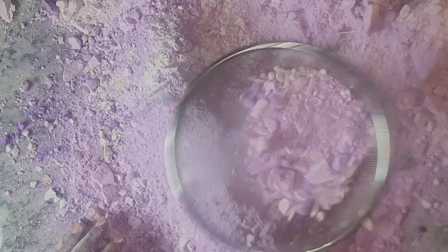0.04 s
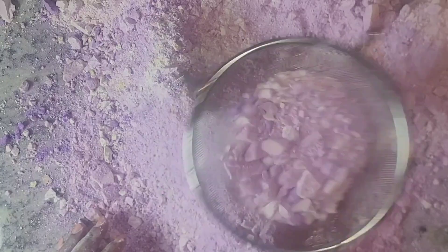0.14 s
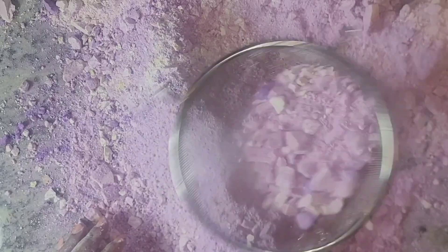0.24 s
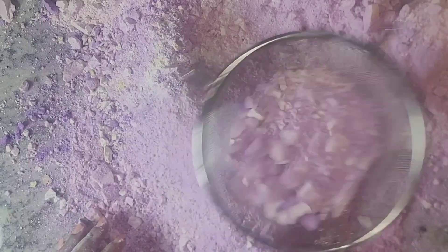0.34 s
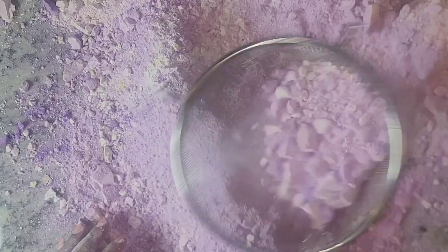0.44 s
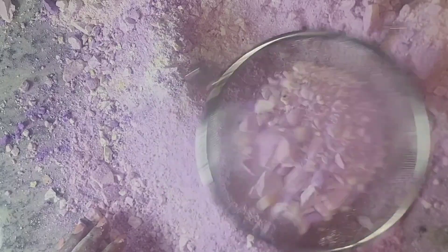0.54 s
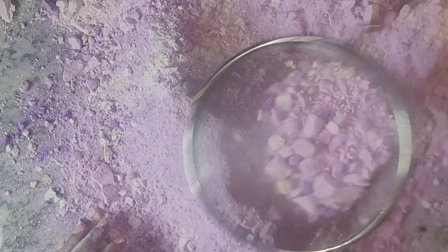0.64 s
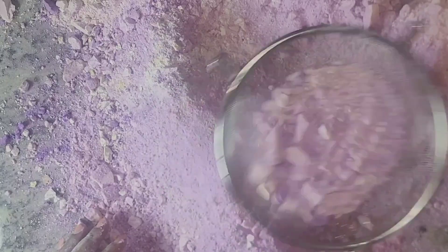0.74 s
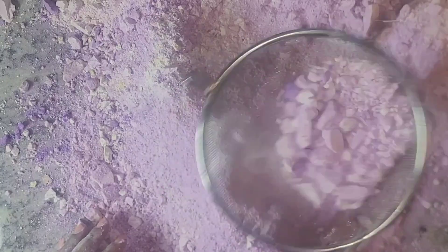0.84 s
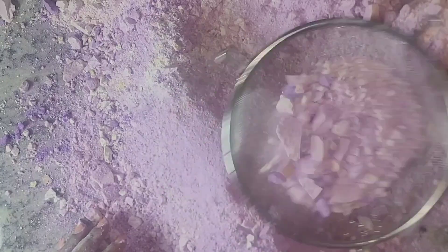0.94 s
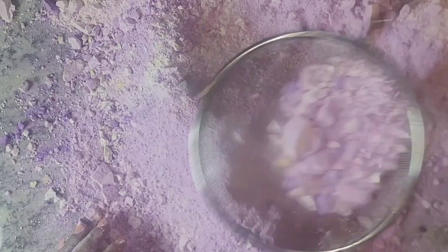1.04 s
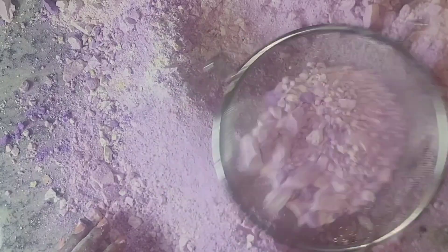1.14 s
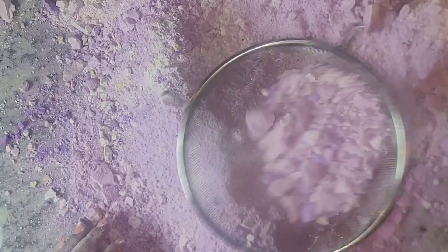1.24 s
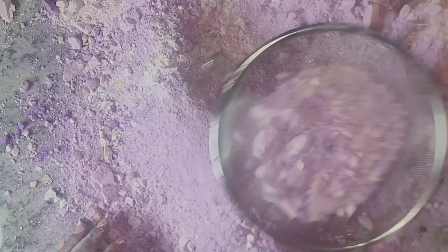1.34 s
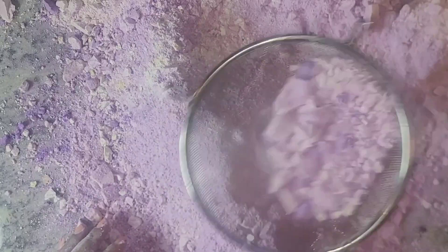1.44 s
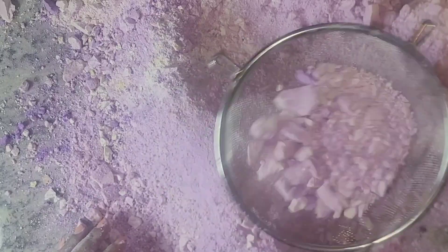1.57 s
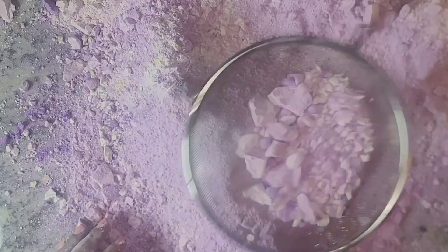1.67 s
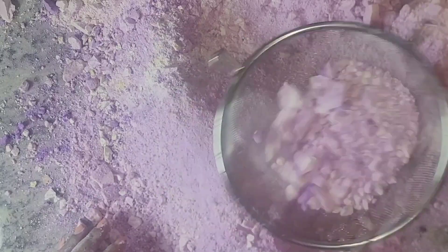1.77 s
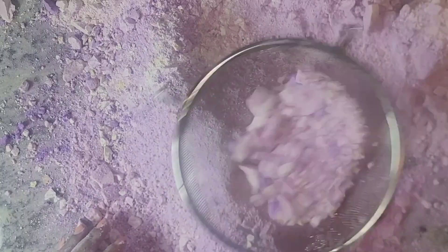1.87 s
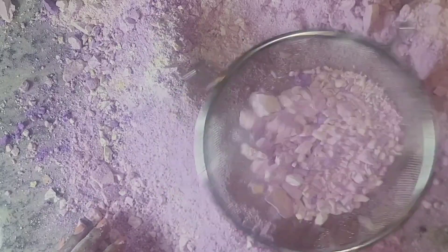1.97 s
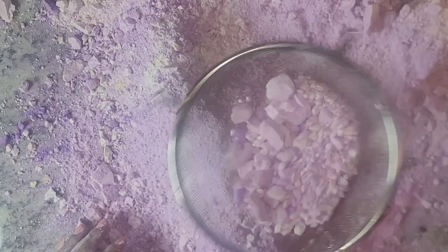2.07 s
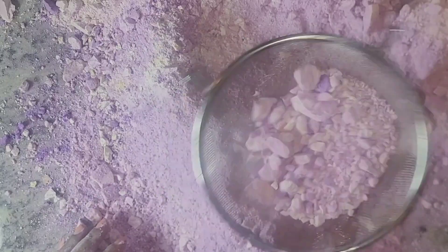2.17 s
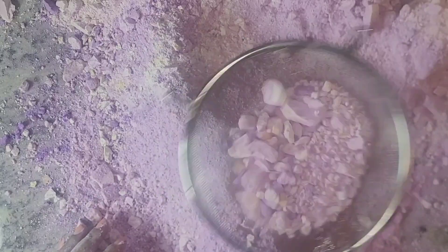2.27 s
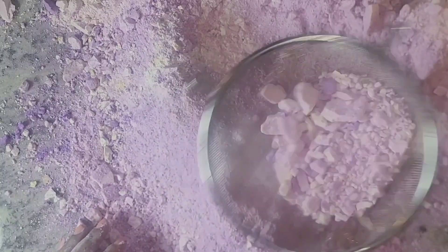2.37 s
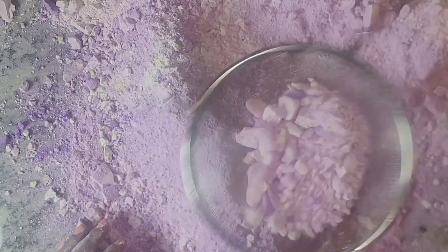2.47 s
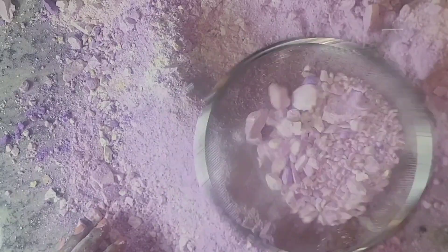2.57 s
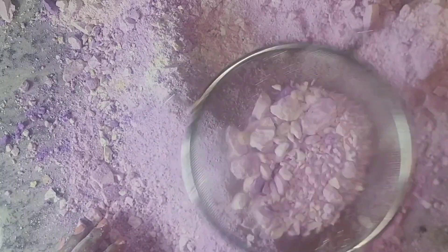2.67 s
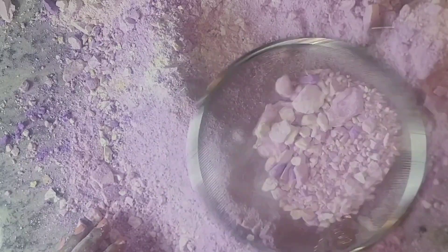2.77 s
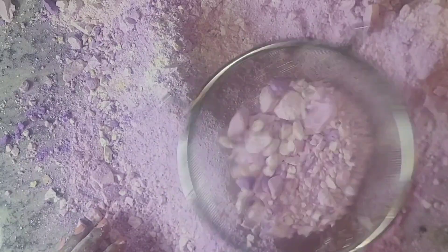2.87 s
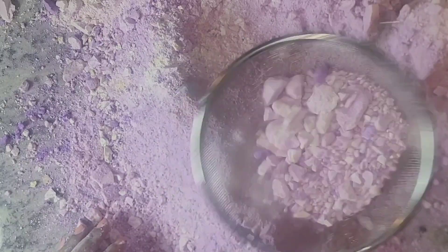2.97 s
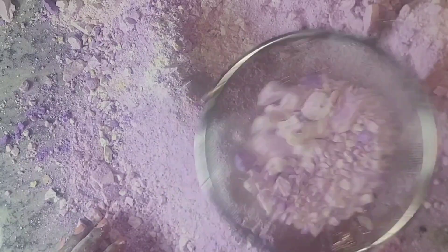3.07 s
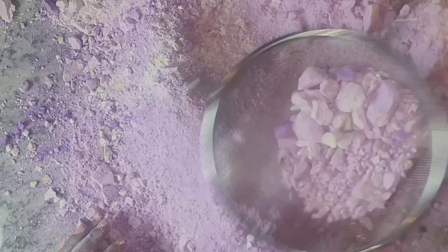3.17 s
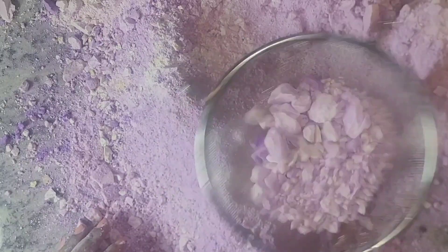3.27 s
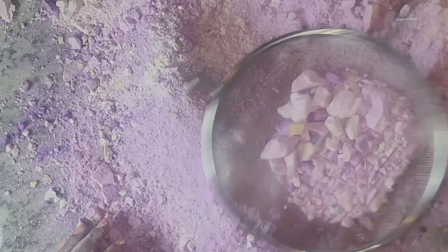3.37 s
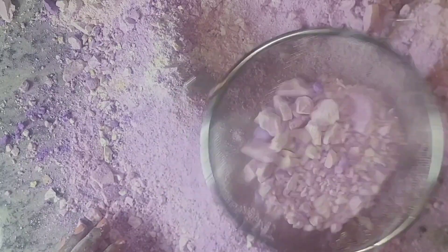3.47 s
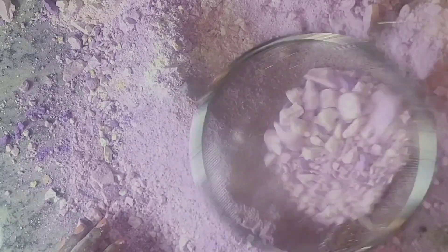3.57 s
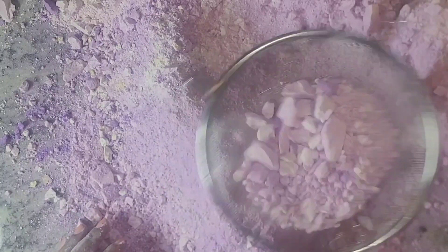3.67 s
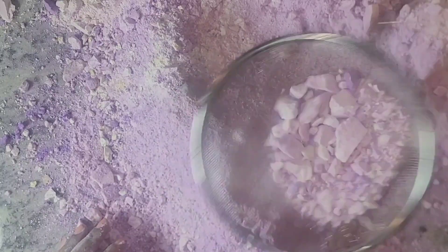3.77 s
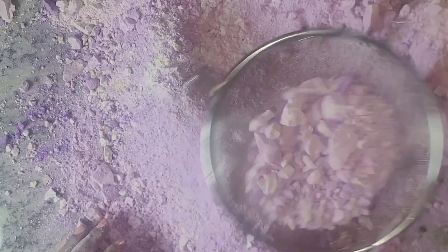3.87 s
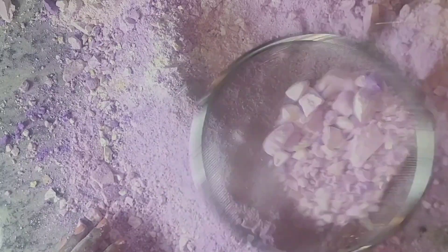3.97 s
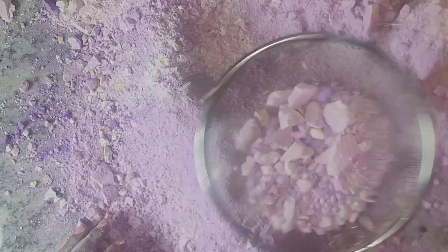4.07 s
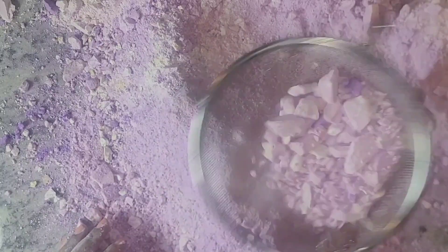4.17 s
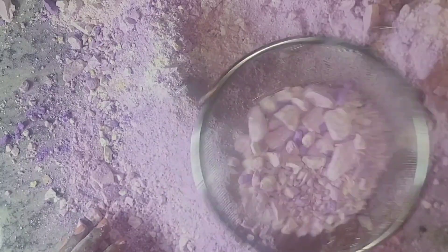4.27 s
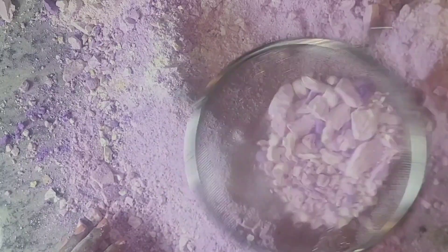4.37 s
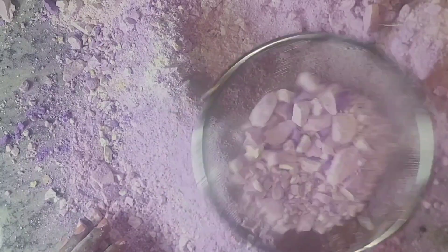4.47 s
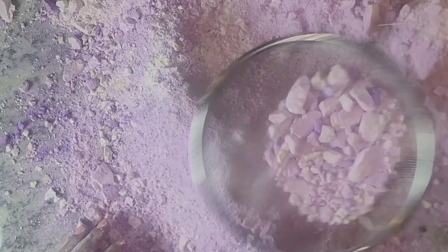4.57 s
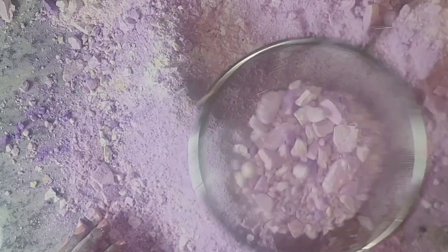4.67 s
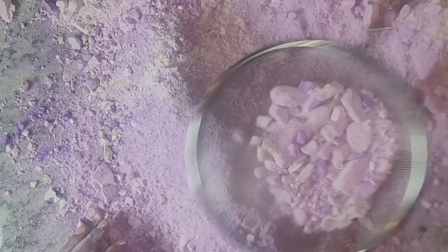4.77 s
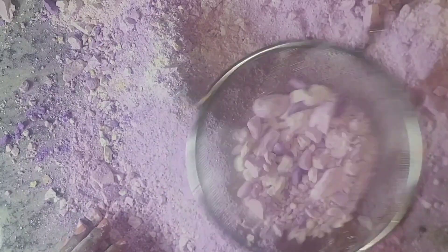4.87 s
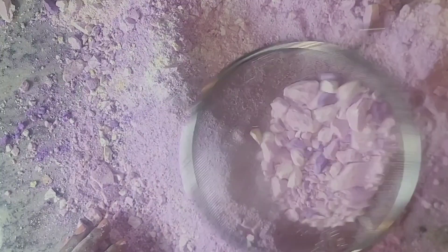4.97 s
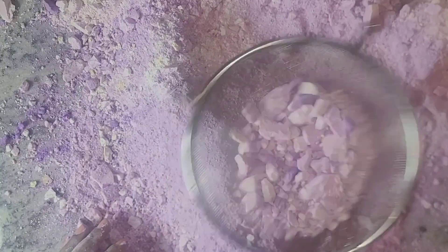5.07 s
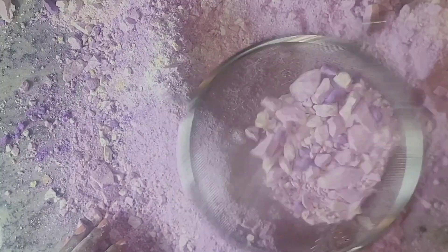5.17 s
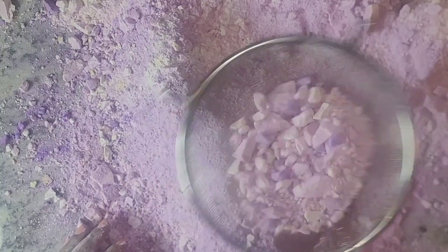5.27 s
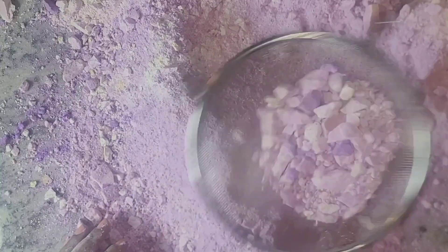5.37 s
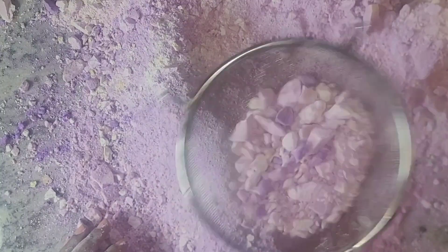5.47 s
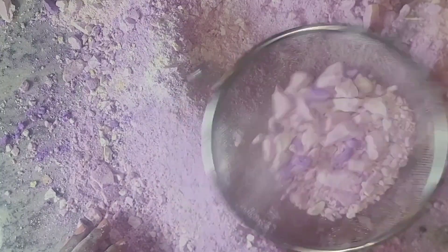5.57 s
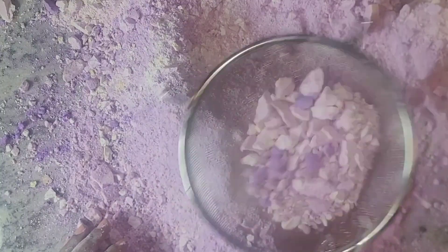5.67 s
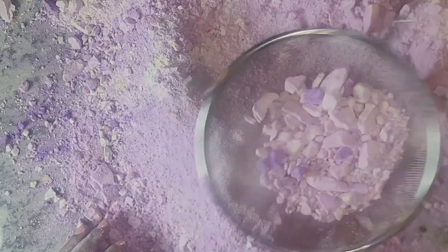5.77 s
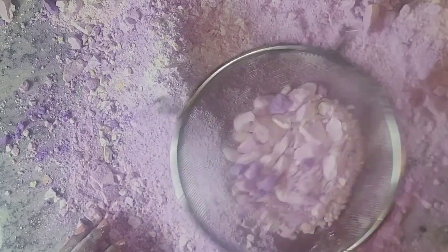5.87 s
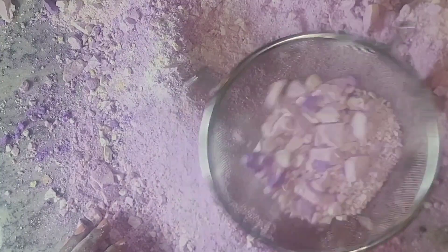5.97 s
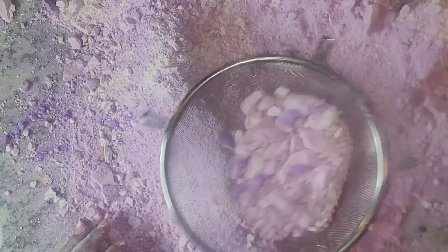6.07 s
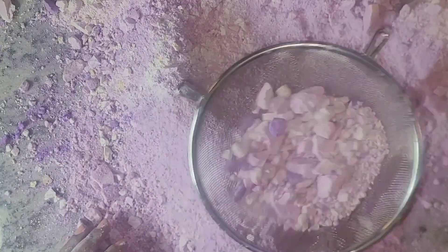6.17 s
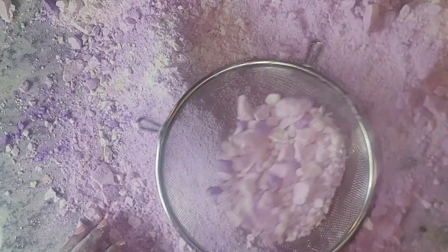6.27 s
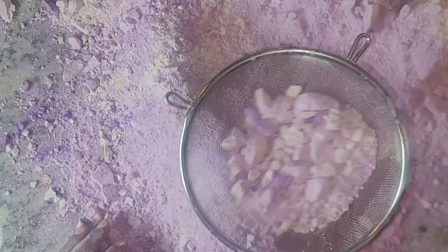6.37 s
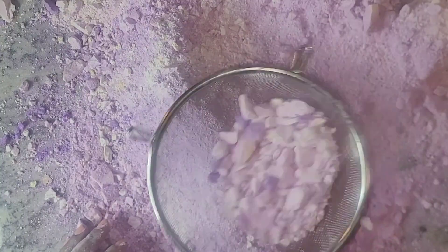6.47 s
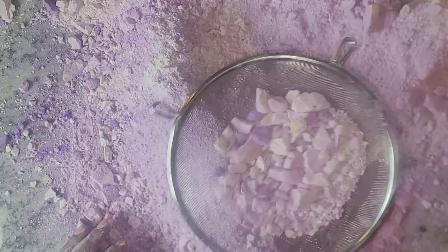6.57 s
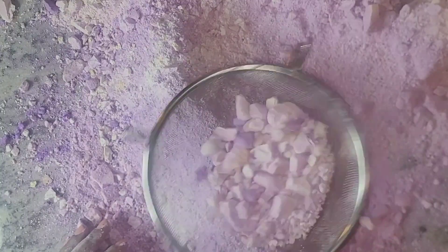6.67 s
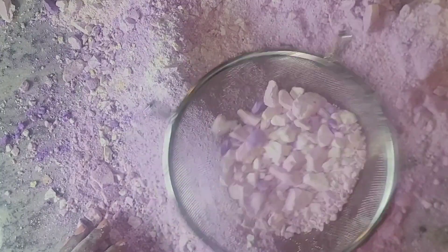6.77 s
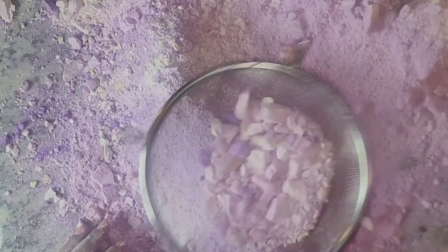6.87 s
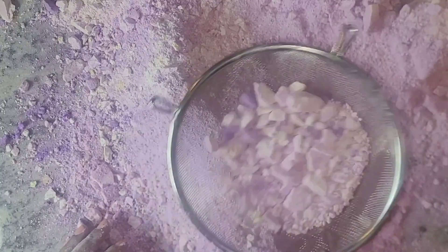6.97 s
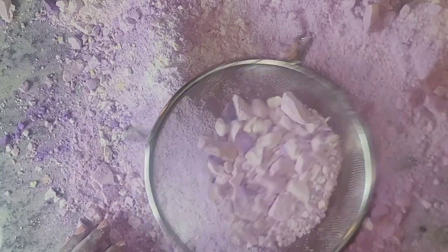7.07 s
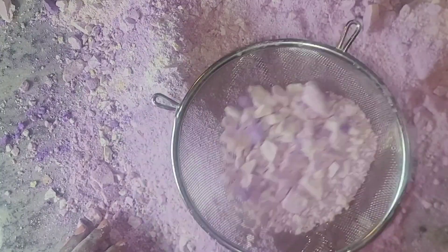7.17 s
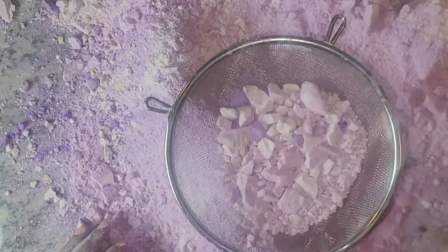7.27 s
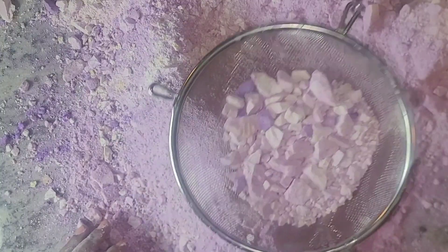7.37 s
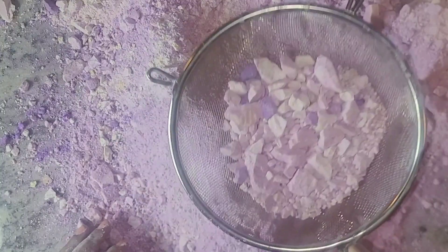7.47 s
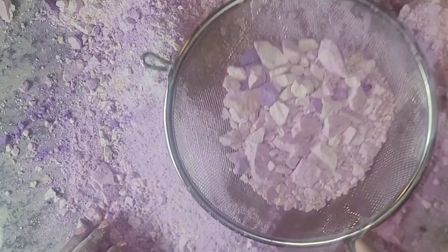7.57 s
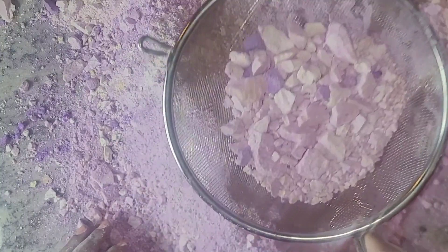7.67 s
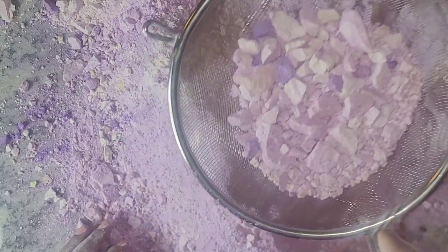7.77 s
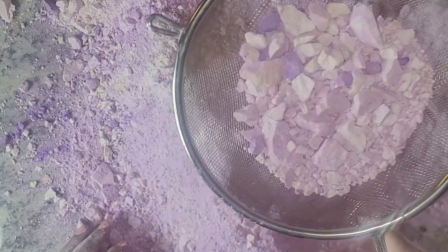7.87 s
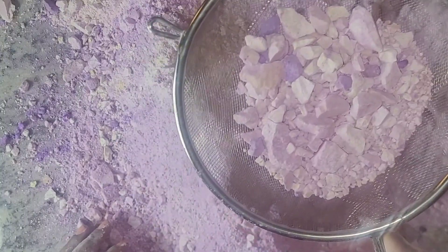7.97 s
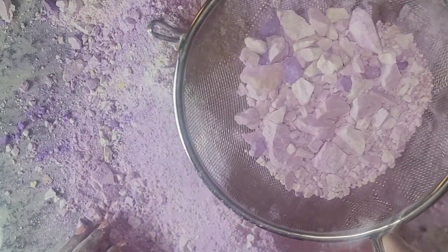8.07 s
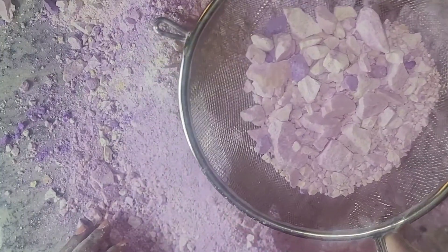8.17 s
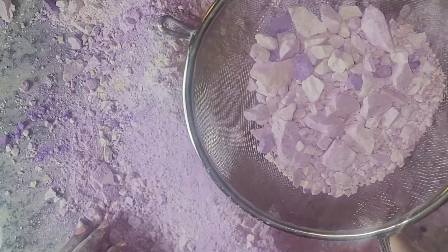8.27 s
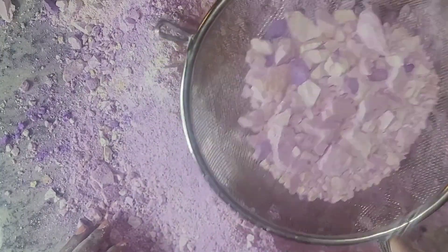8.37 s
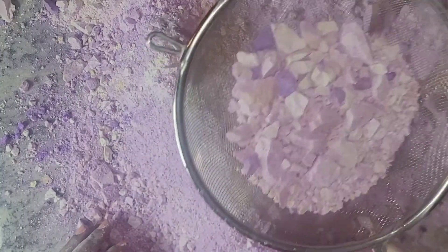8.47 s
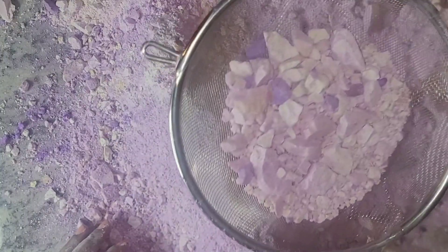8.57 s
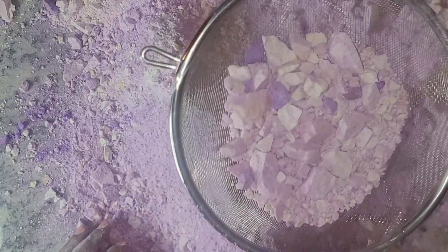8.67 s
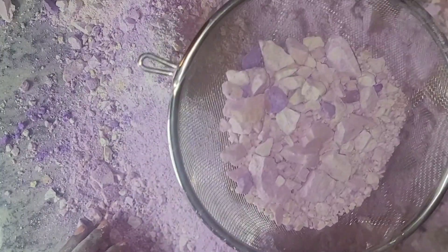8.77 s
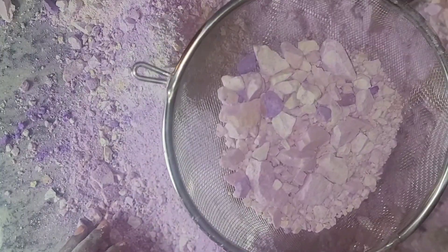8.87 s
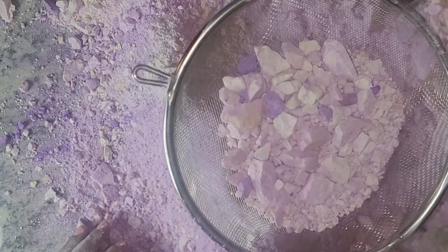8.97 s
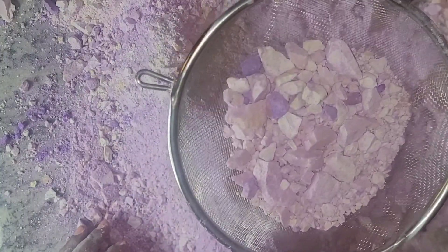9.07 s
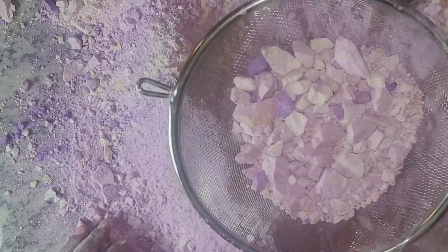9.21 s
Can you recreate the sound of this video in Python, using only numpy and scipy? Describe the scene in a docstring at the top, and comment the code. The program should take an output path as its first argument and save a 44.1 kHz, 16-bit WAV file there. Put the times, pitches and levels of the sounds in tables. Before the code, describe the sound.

Fast, steady to-and-fro sifting of hard chalky pieces in a metal strainer, gritty and bright, stopping after seven seconds with a faint clink and powder hiss.

```python
"""Shaking chalk in a wire sieve

Crushed chalk is shaken to and fro in a wire-mesh sieve, five times a second, close to the microphone.
Random crumb contacts rasp and set the mesh resonances ringing; chunks knock, and noise bursts click.
A distant small clink, made of fading sine tones, is heard during the shaking and again near the end.
The heap settles, then a little powder slides, as filtered grains. Sine tones make a low mains hum and
spells of a thin whine."""
import sys
import numpy as np
from scipy import signal
from scipy.fft import rfft, irfft, next_fast_len
from scipy.io import wavfile

SR = 44100
rng = np.random.default_rng(int(sys.argv[2]) if len(sys.argv) > 2 else 0)


def unload_wav(signal):
    """Save mono or channel-first audio to the path in sys.argv[1] as 16-bit WAV at rate SR, clipped to [-1, 1]."""
    wavfile.write(
        sys.argv[1],
        SR,
        np.round(np.clip(np.atleast_2d(signal).T, -1, 1) * 32767).astype(np.int16),
    )


N = 407484
CUTOFF_HZ = 15150  # nothing is heard much above this


def from_db(db):
    """Turn decibels into a gain."""
    return 10 ** (np.asarray(db) / 20)


def rms_one(x):
    """Scale a sound to an average (rms) strength of 1."""
    return x / np.sqrt(np.mean(x ** 2) + 1e-20)


def clock():
    """Time of every sample, in seconds."""
    return np.arange(N) / SR


def in_time(rows, times):
    """Read each column of a table at the given times, joining its points by straight lines."""
    seconds, *columns = np.transpose(rows)
    return [np.interp(times, seconds, column) for column in columns]


def at_hz(points, hz):
    """Read a spectrum between its points, on a log-frequency axis."""
    point_hz, value = np.transpose(points)
    return np.interp(np.log(hz + 1e-3), np.log(point_hz), value)


def drift(rate):
    """Slow random wandering with a spread of 1; a higher rate wanders faster."""
    # made at a twentieth of the sample rate; the first 4000 values let the filter settle
    r = np.exp(-40 * np.pi * rate / SR)
    noise = rng.standard_normal(N // 20 + 4002)
    slow = signal.lfilter([1], [1, -2 * r, r * r], noise)[4000:]
    return np.interp(np.arange(N) / 20, np.arange(len(slow)), rms_one(slow))


def cut(x, hz, kind):
    """Second-order filter that keeps the lows ("low") or the highs ("high")."""
    return signal.sosfilt(signal.butter(2, min(hz, .45 * SR), kind, fs=SR, output="sos"), x)


def colour(x, spectrum):
    """Shape a steady sound to a spectrum that falls away below its first point; rms 1."""
    size = next_fast_len(N)
    hz = np.arange(size // 2 + 1) * SR / size
    low_fall = np.minimum(hz / spectrum[0][0], 1) ** 4
    gain = from_db(at_hz(spectrum, hz)) * low_fall * (hz < CUTOFF_HZ)
    return rms_one(irfft(rfft(x, size) * gain, size)[:N])


def resonate(x, modes):
    """Let a sound excite resonances side by side; each mode is (pitch [Hz], width [Hz], level [dB])."""
    out = 0
    for hz, width, db in modes:
        r = np.exp(-np.pi * width / SR)
        feedback = [1, -2 * r * np.cos(2 * np.pi * hz / SR), r * r]
        ring = signal.lfilter([1, 0, -1], feedback, x + 1e-18)
        out = out + from_db(db) * (1 - r * r) / 2 * ring
    return out


def grains(per_s, spread_db):
    """Random contacts of uneven size, with the same mean power at any rate."""
    sizes = from_db(spread_db * np.minimum(rng.exponential(1, N), 4)) * rng.choice([-1, 1], N)
    touches = rng.random(N) < per_s / SR
    return rms_one(sizes * touches / np.sqrt(per_s))


def burst(start_s, t60):
    """Noise that starts at once and fades by 60 dB in t60 seconds."""
    age = clock() - start_s
    return rng.standard_normal(N) / 2 * (age >= 0) * from_db(-60 * np.clip(age / t60, 0, 3))


def swell(slides):
    """Power of the sliding heap: each stroke rises and falls as a bell, its length taken at half power."""
    t = clock()[::16]
    power = 0
    for middle_s, db, length_s in slides:
        bell = .5 ** np.minimum((2 * (t - middle_s) / length_s) ** 2, 60)
        power = power + from_db(2 * db) * bell
    return np.interp(clock(), t, power)


def trickle(power, t60):
    """Loose pieces keep rolling after a stroke, so its power dies away gradually."""
    r = from_db(-60 / (t60 * SR)) ** 2
    return signal.lfilter([1 - r], [1, -r], power)


# colour of the still air: (pitch [Hz], level [dB per Hz])
AIR_COLOUR = [(140, -4), (210, 0.5), (300, -5.5), (500, -10), (750, -12), (1000, -17.5), (2000, -23),
              (3000, -27.5), (5000, -30), (10000, -47.5), (15000, -42)]
# colour of the low rumble: (pitch [Hz], level [dB per Hz])
RUMBLE_COLOUR = [(22, -22), (38, 6), (58, 5), (80, 8.5), (110, 8.5), (150, 0), (220, -26.5)]
# loudness of the low rumble: (time [s], level [dB])
RUMBLE_LEVEL = [(0, -49), (.9, -48), (1.2, -43), (1.8, -46), (2, -51), (3.8, -44), (4.2, -45.5), (6.3, -44),
                (7.5, -48), (8.2, -48)]


def room_tone():
    """Still air and a low rumble, both filtered noise; the rumble slowly changes in level."""
    air = from_db(-49.0) * colour(rng.standard_normal(N), AIR_COLOUR)
    rumble_db, = in_time(RUMBLE_LEVEL, clock())
    return air + from_db(rumble_db) * colour(rng.standard_normal(N), RUMBLE_COLOUR)


# colour of each microphone port's own noise: (pitch [Hz], level [dB per Hz])
PORT_COLOUR = [(20, 20), (80, -3), (130, 4), (190, 4), (1000, 13), (15000, 8.5)]


def port_noise():
    """Faint noise that each of the two microphone ports has for itself."""
    return from_db(-64.5) * np.array([colour(rng.standard_normal(N), PORT_COLOUR) for port in range(2)])


SHAKE_PERIOD_S, SHAKING_ENDS_S = 0.1994, 7.1  # the hand keeps a steady beat
PUSH_S = 0.03  # a push is always short
RETURN_DB, RETURN_S = -33.5, 0.041  # the heap's tumble back, before effort, stalls and fading alter it
RETURN_FOLLOWS = 0.45  # share of the swing in effort that reaches the return
SLOWER_PER_DB = 0.0758  # a weaker return lasts longer, by about this share per dB
RETURN_FADE_DB_PER_S = 0.27  # the heap lightens as chalk sifts through
# the hand runs a little ahead of or behind its beat:
# (time [s], lag of the push [s], wait until the heap returns [s])
HAND_TIMING = [(0, .027, .088), (1.2, .02, .083), (2, 0.01, 0.081), (2.4, -0.0055, 0.085),
               (3.7, -.022, 0.091), (4.8, -0.0092, 0.081), (5.1, -0.012, 0.091), (6, 0.022, 0.091),
               (6.2, 0.034, 0.076), (7, 0.026, 0.081)]
# effort of the hand, as the level of a push: (time [s], level [dB])
HAND_EFFORT = [(0, -29.5), (.5, -29), (1, -31.5), (1.4, -30), (1.8, -28.5), (2.05, -33.5), (2.55, -29),
               (3.2, -30.5), (3.38, -33.5), (3.55, -31), (4.8, -31), (5, -29), (5.2, -30.5), (5.8, -31),
               (6, -29), (6.2, -33), (6.6, -33.5), (7, -32.5)]
# the heap hangs on the mesh and only creeps back: (time [s], loss [dB])
HEAP_STALLS = [(0.12, 5.5), (0.9, 5.5), (1.29, 3.3), (2.09, 4), (2.27, 3.5), (3.06, 3.5), (3.46, 4),
               (5.68, 4), (6.29, 4), (6.5, 3), (6.69, 2.3), (7.09, 2.2)]


def strokes():
    """Each shake throws the heap forward, then lets it tumble back: lists of (time s, level dB, length s)."""
    beats = np.arange(0, SHAKING_ENDS_S, SHAKE_PERIOD_S)
    lag, wait = in_time(HAND_TIMING, beats)
    push_db, = in_time(HAND_EFFORT, beats)
    push_s = beats + lag
    back_s = push_s + wait
    effort_swing = push_db - push_db.mean()
    fade_db = RETURN_FADE_DB_PER_S * (beats - beats.mean())
    back_db = RETURN_DB + RETURN_FOLLOWS * effort_swing - fade_db
    for stall_s, loss_db in HEAP_STALLS:
        nearest = np.argmin(np.abs(back_s - stall_s))
        back_db[nearest] -= loss_db
    back_length = RETURN_S * np.exp(SLOWER_PER_DB * (RETURN_DB - back_db))
    pushes = [(s, db, PUSH_S) for s, db in zip(push_s, push_db)]
    return pushes, list(zip(back_s, back_db, back_length))


# tones of the mains hum, before wavers and dips: (pitch [Hz], rms level [dB], spread of the waver [dB])
HUM_TONES = [(120.26, -34, 0.32), (59.5, -50.5, 4.5), (210, -61, -2), (293, -65, 0)]


def hum(dip_db=4.0, lead_s=0.049, dip_s=0.016):
    """Mains hum of wavering sine tones, which dips briefly as the sieve turns for each push."""
    t = clock()
    coarse_t = t[::16]
    pushes, _ = strokes()
    turning = 0
    for push_s, _, _ in pushes[1:]:
        # the dip comes a little before the push
        distance = (coarse_t - push_s + lead_s) / dip_s
        turning = turning + np.exp(-np.minimum(distance ** 2, 60))
    tones = 0
    for hz, db, waver in HUM_TONES:
        level = np.sqrt(2) * from_db(db + waver * drift(8.3))
        tones = tones + level * np.sin(2 * np.pi * (hz * t + rng.random()))
    return tones * from_db(-dip_db * np.interp(t, coarse_t, turning))


def chips(per_s, count=16):
    """Hard chips tick against each other, each size at its own pitch."""
    ticks, dealt = grains(per_s, spread_db=5.0), rng.integers(0, count, N)
    pitches = np.geomspace(2500, 9000, count) * rng.uniform(0.82, 1.0, count)
    return rms_one(sum(resonate(ticks * (dealt == k), [(hz, hz / 25, 0)]) for k, hz in enumerate(pitches)))


# colour of the crumbs' rasp: (pitch [Hz], level [dB per Hz])
CRUMB_COLOUR = [(250, -10), (380, -3.5), (700, -9), (1400, -8.5), (2000, -4), (3000, -1), (4500, -2),
                (6500, 0), (8000, -2), (10000, -6.5), (12500, -7.5), (15500, -9.5)]
# resonances of the loaded mesh: (pitch [Hz], width [Hz], level [dB])
MESH_MODES = [(2246, 74, 6.5), (2320, 60, 3.5), (2570, 60, 3), (3490, 130, -5), (4135, 110, 2),
              (4300, 92, -25), (4890, 41, -2)]
# body resonances of the knocking heap, also used for the dull knocks:
# (pitch [Hz], width [Hz], level [dB])
HEAP_MODES = [(376, 30, 4.5), (580, 350, -2), (940, 130, 3.5), (1090, 117, 1), (1390, 240, -1),
              (1743, 114, 2.5), (2450, 220, -3)]


def shaking():
    """Crumbs rasp on the wire, the mesh rings most on the push, the chunks knock most on the way back."""
    pushes, returns = strokes()
    push, back = swell(pushes), swell(returns)
    rolling = trickle(push + back, t60=0.52)
    slide = push + back + from_db(-18) * rolling
    speed = np.sqrt(slide / slide.max())
    # faster sliding makes more contacts a second; the crumbs move in clumps
    rasp = colour(grains(1500 + 13000 * speed, spread_db=0.5), CRUMB_COLOUR) * from_db(1.26 * drift(41))
    # now coarser, now finer crumbs reach the wire
    coarse = signal.sosfiltfilt(signal.butter(1, 5000, fs=SR, output="sos"), rasp)
    fine = rasp - coarse
    rasp = coarse * from_db(1.0 * drift(9.4)) + fine * from_db(1.0 * drift(18))
    # the shifting load favours now one mesh resonance, now another
    scrapes = grains(1200 + 5000 * speed, spread_db=2.0)
    wires = rms_one(sum(resonate(scrapes, [mode]) * from_db(2.0 * drift(5.5)) for mode in MESH_MODES))
    chunks = rms_one(resonate(grains(1000 + 2200 * speed, spread_db=2.5), HEAP_MODES))
    # square roots turn power into loudness of the wave
    return (from_db(-1.5) * rasp * np.sqrt(slide)
            + from_db(-4.5) * wires * np.sqrt(push + 0.3 * back + 0.16 * rolling)
            + from_db(-7.5) * chunks * np.sqrt(0.04 * push + back + 0.44 * rolling)
            + from_db(-11.5) * chips(400) * np.sqrt(.5 * push + back + 0.053 * rolling))


# sharp, bright clicks, as a chunk snaps on the wire or a push starts abruptly:
# (time [s], level before filtering [dB])
BRIGHT_CLICKS = [(1.13, -19), (1.3902, -32), (1.671, -21.5), (2.8519, -28), (4.154, -29), (4.559, -20),
                 (5.7823, -29), (5.9225, -20), (6.205, -19.5), (6.264, -20)]
# a big chunk drops on the heap: (time [s], peak level [dB])
HEAP_KNOCKS = [(0.1117, -19), (0.497, -25.5), (6.111, -25)]


def hard_hits():
    """Noise bursts click as a chunk snaps on the wire or a push starts abruptly; big chunks knock dully."""
    clicks = sum(from_db(db) * burst(s, t60=0.016) for s, db in BRIGHT_CLICKS)
    clicks = cut(clicks, 2100, "high")
    blows = np.zeros(N)
    for s, db in HEAP_KNOCKS:
        blows[round(s * SR)] = from_db(db)
    knocks = cut(cut(resonate(blows, HEAP_MODES), 2100, "low"), 570, "high")
    return from_db(0.5) * clicks + blows.max() * knocks / np.abs(knocks).max()


WHINE_DB, WHINE_PAUSE_S = -55.5, 0.015
# spells of a high electronic whine, which restarts at even intervals:
# (start [s], end [s], interval [s], base pitch [Hz])
WHINE_SPELLS = [(0.225, 1.7, 0.4, 14130), (2.104, 4.4, 0.45, 13800), (8.207, 8.42, 0.25, 14620),
                (8.458, 9.3, 0.303, 14000)]


def whine(sag_hz=1150, sag_s=.022, saw_hz=450, saw_per_s=36, wander_hz=50):
    """A thin sine whine that sags in pitch as each run starts, and wavers in a quick sawtooth."""
    t, out = clock(), np.zeros(N)
    wander = wander_hz * drift(10)
    for start, end, interval, hz in WHINE_SPELLS:
        on = (t >= start) & (t < end)
        age = (t[on] - start) % interval
        sag = sag_hz * np.exp(-((age - sag_s) / .017) ** 2)
        saw = saw_hz * ((age * saw_per_s) % 1 - .5)
        pitch = hz + wander[on] - sag - saw
        left = np.minimum(interval - WHINE_PAUSE_S - age, end - t[on])
        fade = np.clip(np.minimum(age, left) / .008, 0, 1)
        out[on] += np.sqrt(2) * from_db(WHINE_DB) * fade * np.sin(2 * np.pi * np.cumsum(pitch) / SR)
    return out


ROOM_T60_S = 0.4  # time for the room's echo to fade by 60 dB


def room(x):
    """A dull tail of dense reflections, made from fading noise."""
    age = np.arange(SR // 2) / SR
    echoes = rng.standard_normal(len(age)) * from_db(-60 * age / ROOM_T60_S) * (age > .004)
    tail = cut(echoes, 11000, "low")
    return signal.oaconvolve(x, tail / np.sqrt(np.sum(tail ** 2)))[:N]


# distant small clinks: (time [s], peak level [dB], pitch ratio [times], contact cut-off [Hz],
# room tail against the clink [dB])
CLINK_EVENTS = [(2.110, -22, .98, 1490, -8), (8.644, -35, 0.99, 7000, 5), (8.651, -28.5, 1.01, 3500, 1.5)]
# ringing tones of the distant clink: (pitch [Hz], level [dB], time to fade by 60 dB [s])
CLINK_MODES = [(1853, 0, 0.046), (1940, -7, 0.029), (2250, -14, 0.037), (2770, -5, 0.014),
               (3170, -4, 0.011), (3480, -7, 0.014), (5760, -12, 0.022)]


def distant_clinks(touch_s=0.0019):
    """A distant small clink, made of fading sine tones, is carried by the room."""
    out, age = np.zeros(N), np.arange(SR // 8) / SR
    for s, db, ratio, contact_hz, tail_db in CLINK_EVENTS:
        ring = 0
        for hz, level, t60 in CLINK_MODES:
            ring = ring + from_db(level - 60 * age / t60) * np.sin(2 * np.pi * hz * ratio * age)
        ring = cut(ring * np.minimum(age / touch_s, 1), contact_hz, "low")
        clink, start = np.zeros(N), round(s * SR)
        clink[start:start + len(ring)] = from_db(db) * ring / np.abs(ring).max()
        out += clink + from_db(tail_db) * clink.std() * rms_one(room(clink))
    return out


# the heap comes to rest: its trickle swells to a peak at SETTLE_S, then dies away
SETTLE_S, SETTLE_DB, SETTLE_RISE_DB_PER_S, SETTLE_FALL_DB_PER_S = 7.19, -49.5, 80, 33
# the powder starts to slide and gathers to a steady flow
POWDER_S, POWDER_RISE_S, POWDER_DB = 8.91, 0.17, -48.5
# resonances of the settling heap: (pitch [Hz], width [Hz], level [dB])
SETTLING_MODES = [(644, 34, 8), (810, 88, 6), (1330, 220, -5), (1910, 110, -1), (2320, 130, -7),
                  (2670, 63, 3), (4470, 2500, -13)]
# colour of the sliding powder: (pitch [Hz], level [dB per Hz])
POWDER_COLOUR = [(1000, -20), (2500, -7), (5000, -3), (8000, -3), (11000, -7), (15000, -10)]


def settling():
    """The last crumbs come to rest; later fine powder slides with a soft hiss of dense grains."""
    age = clock() - SETTLE_S
    fade_db = np.minimum(SETTLE_RISE_DB_PER_S * age, -SETTLE_FALL_DB_PER_S * age)
    flow = 1 - np.exp(-np.maximum(clock() - POWDER_S, 0) / POWDER_RISE_S)
    trickling = rms_one(resonate(grains(980, spread_db=2.0), SETTLING_MODES))
    crumbs = from_db(SETTLE_DB + fade_db) * trickling
    powder = from_db(POWDER_DB) * flow * colour(grains(16000, spread_db=4.0), POWDER_COLOUR)
    return crumbs + powder


# difference between the two microphone ports: (pitch [Hz], side minus middle [dB])
PORT_SPREAD = [(30, -26), (70, -29), (130, -36), (260, -20), (500, -17), (1000, -21), (2200, -25),
               (4000, -23), (8000, -21), (13000, -20)]


def two_ports(x):
    """Two close microphone ports hear nearly the same; scattered sound makes a faint difference."""
    size = next_fast_len(N + SR // 10)
    hz = np.arange(size // 2 + 1) * SR / size
    # random phases scatter the sound without altering its level
    scatter = np.exp(1j * np.angle(rfft(rng.standard_normal(SR // 50), size)))
    side = irfft(rfft(x, size) * scatter * from_db(at_hz(PORT_SPREAD, hz)), size)[:N]
    return np.array([x + side, x - side])


def scene():
    """The sieve in a small room, with distant clinks, over the background."""
    sieve = shaking() + hard_hits() + settling()
    in_room = sieve + from_db(-17.0) * room(sieve)
    background = hum() + whine() + room_tone()
    return two_ports(in_room + distant_clinks() + background) + port_noise()


def record(dry):
    """A steep filter removes the very top of the treble."""
    return signal.sosfilt(signal.ellip(10, .2, 80, CUTOFF_HZ, fs=SR, output="sos"), dry)


dry = scene()
out = record(dry)
unload_wav(out)
```